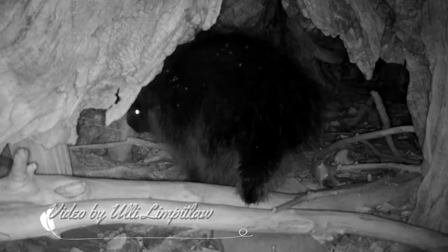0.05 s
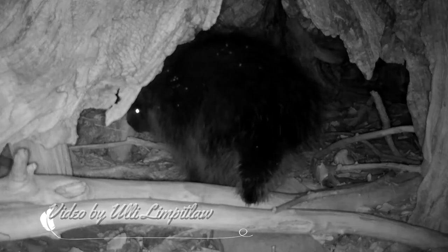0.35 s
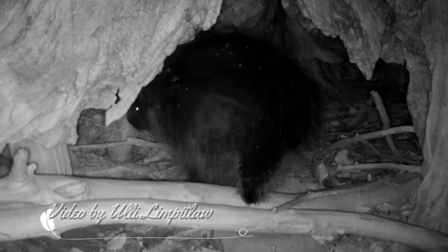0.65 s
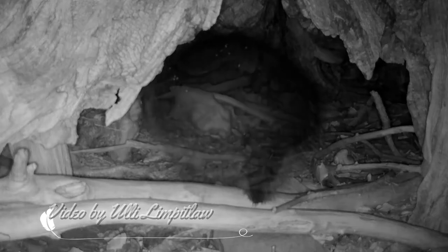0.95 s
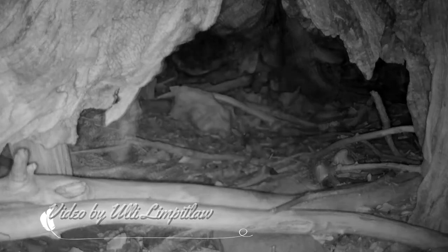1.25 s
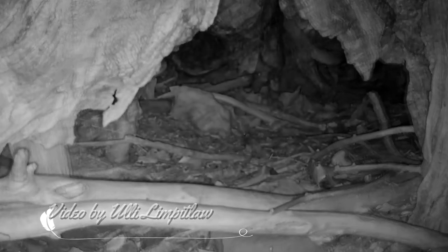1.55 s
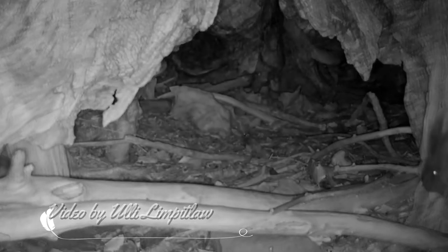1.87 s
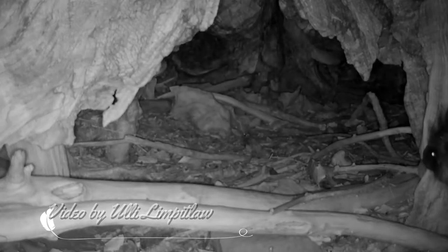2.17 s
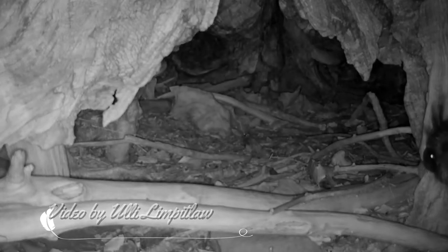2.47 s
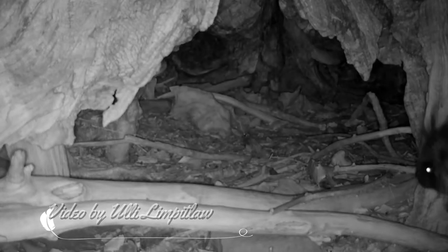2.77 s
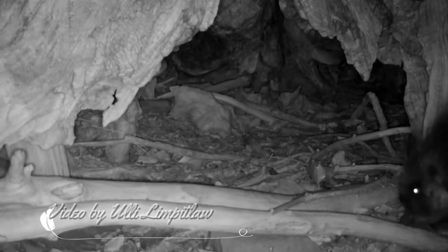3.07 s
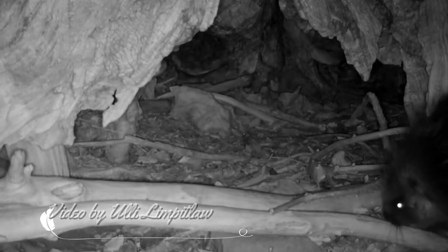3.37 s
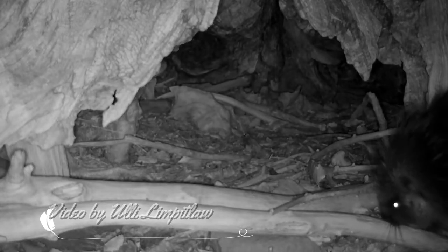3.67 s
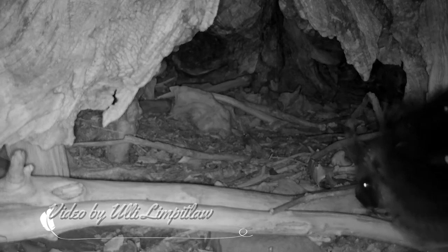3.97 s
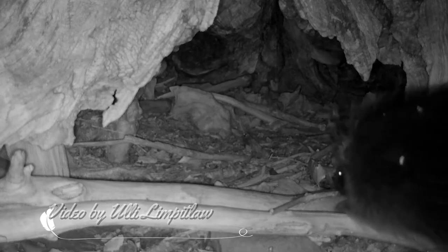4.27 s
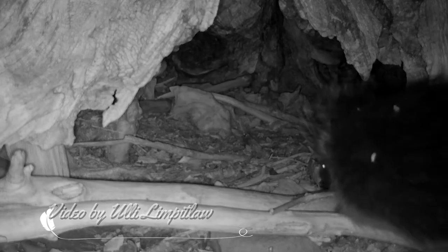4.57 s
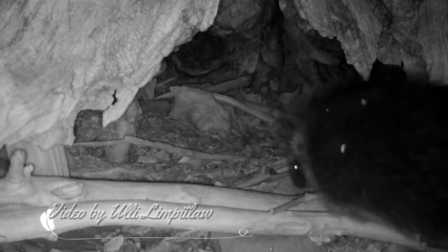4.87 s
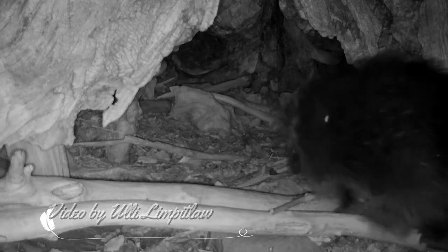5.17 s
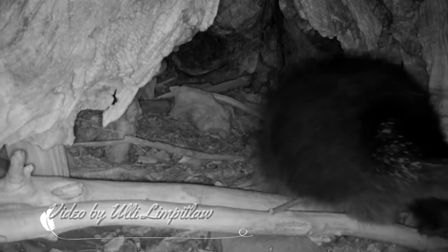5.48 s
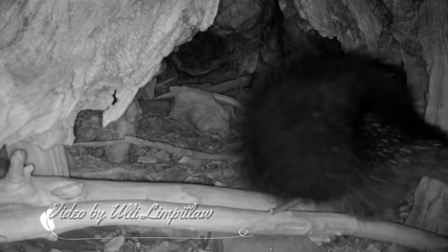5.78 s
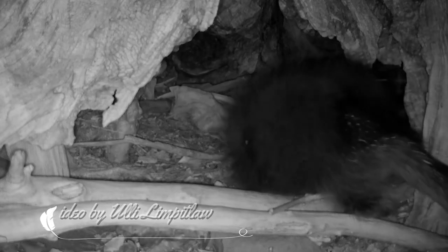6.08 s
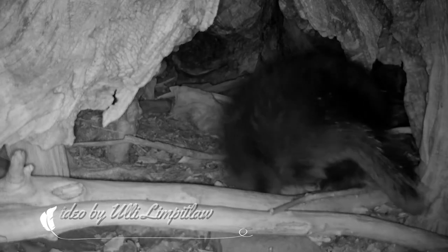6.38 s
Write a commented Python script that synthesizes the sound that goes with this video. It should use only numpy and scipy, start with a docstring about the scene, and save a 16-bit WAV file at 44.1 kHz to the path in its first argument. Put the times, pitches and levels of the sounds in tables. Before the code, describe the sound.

A faint woodland rush jumps suddenly louder, while an animal's claws and quills scratch wood and small twigs crack close by.

```python
"""A porcupine shuffles in and out of a hollow log at night.
A faint rush of far wind or water fills the wood, under a thin electronic whine and hiss.
From 1.2 s litter ticks, quills and claws scrape bark, and dry twigs snap.
At 1.55 s the sound cuts out for an instant and returns much louder, with a high fizz on the rush.
Feet pad softly from 1.8 s; two more spells of shuffling start at 2.2 s and 4.9 s."""
import sys
import numpy as np
from scipy import signal
from scipy.fft import rfft, irfft
from scipy.io import wavfile
from scipy.ndimage import uniform_filter1d

SR = 44100
rng = np.random.default_rng(int(sys.argv[2]) if len(sys.argv) > 2 else 0)


def generate_wav(signal):
    """Clip the signal to [-1, 1] and save it as 16-bit WAV at the path in sys.argv[1]."""
    frames = np.transpose(np.atleast_2d(signal))
    scaled = np.clip(frames, -1, 1) * 32767
    pcm = np.round(scaled).astype(np.int16)
    wavfile.write(sys.argv[1], SR, pcm)


N = 287973
TIME = np.arange(N) / SR
GAP_START_S, GAP_END_S = 1.553, 1.5685

# rush before and after the gap: (time [s], relative level [dB])
FAINT_RUSH = [(0, -59), (0.8, -60.5), (1.54, -64.5)]
LOUD_RUSH = [(1.64, -46), (2.03, -43), (2.89, -41.5), (4.51, -43), (5.19, -41), (6.37, -41.5), (6.42, -41)]
# spells of shuffling: (start [s], end [s], tick level [dB], scrape level [dB])
SPELLS = [(1.18, 1.46, -78, -64), (2.2, 3.45, -56.5, -51), (4.901, 6.5, -63, -50.5)]


def gain_of(db):
    """Decibels to amplitude."""
    return 10 ** (np.asarray(db) / 20)


def unit_rms(x):
    """Scales to rms 1."""
    return x / np.sqrt(np.mean(x ** 2) + 1e-20)


def coloured(x, spectrum):
    """Filters by (frequency [Hz], gain [dB]) points, joined on a log-frequency axis."""
    point_hz, point_db = np.transpose(spectrum)
    hz = np.fft.rfftfreq(len(x), 1 / SR)
    db = np.interp(np.log(hz + 1), np.log(point_hz + 1), point_db)
    return irfft(rfft(x) * gain_of(db), len(x))


def add(mix, start_s, sound):
    """Mixes a sound in at start_s."""
    part = mix[max(round(start_s * SR), 0):][:len(sound)]
    part += sound[:len(part)]


def swell_db(curve, time_s):
    """Height of a level curve above its median."""
    point_s, db = np.transpose(curve)
    return np.interp(time_s, point_s, db) - np.median(db)


def rush(curve, colour, treble_db, treble_per_swell, offset_db, patch_db=0.5, split_hz=1900):
    """Far turbulence: noise with faint drifting patches; the treble share varies with the swell."""
    hz, t, spectra = signal.stft(rng.standard_normal(N), SR, nperseg=1024, noverlap=768)
    patches = uniform_filter1d(rng.standard_normal(spectra.shape), size=12, axis=0)
    patches = unit_rms(uniform_filter1d(patches, size=14, axis=1))
    treble = (hz ** 4 / (hz ** 4 + split_hz ** 4))[:, None]
    shelf_db = treble * (treble_db + treble_per_swell * swell_db(curve, t))
    spectra = spectra * gain_of(patch_db * patches + shelf_db)
    air = signal.istft(spectra, SR, nperseg=1024, noverlap=768)[1][:N]
    return unit_rms(coloured(air, colour)) * gain_of(np.interp(TIME, *np.transpose(curve)) + offset_db)


def electronics(whine_hz=7796.2, step_hz=29.78, follow=0.98):
    """A thin whine whose phase steps back and forth, over white hiss that follows the rush level."""
    before_gap = TIME < GAP_START_S
    step_rad = 1.4 * np.tanh(5 * np.sin(2 * np.pi * step_hz * TIME))
    phase = 2 * np.pi * whine_hz * TIME + step_rad
    whine = np.sqrt(2) * (np.sin(phase) + gain_of(-18) * np.sin(2 * phase))
    whine_db = np.where(before_gap, -90.5, -89.0)
    hiss_db = np.where(before_gap, -86.0 + follow * swell_db(FAINT_RUSH, TIME),
                       -86.7 + follow * swell_db(LOUD_RUSH, TIME))
    return whine * gain_of(whine_db) + rng.standard_normal(N) * gain_of(hiss_db)


def litter(ticks_per_s=70, spread_db=5.0, decay_s=0.0012, highpass_hz=5500, rise_s=0.04, fade_s=0.076):
    """Bark crumbs crack underfoot: sparse, uneven, bright ticks that rise and settle with each spell."""
    sizes = gain_of(spread_db * np.minimum(rng.exponential(1, N), 2.5))
    impulses = sizes * (rng.random(N) < ticks_per_s / SR)
    cracks = rng.standard_normal(N) * signal.lfilter([1], [1, -np.exp(-1 / (decay_s * SR))], impulses)
    ticks = signal.sosfilt(signal.butter(2, highpass_hz, "highpass", fs=SR, output="sos"), cracks)
    stirring = np.zeros(N)
    for start_s, end_s, db, _ in SPELLS:
        early_s, late_s = np.maximum(start_s - TIME, 0), np.maximum(TIME - end_s, 0)
        stirring += gain_of(db) * np.exp(-early_s / rise_s - late_s / fade_s)
    return unit_rms(ticks) * stirring


def friction(strokes, slips_per_s, width_oct, noise_gain, crisp_hz=7000):
    """Each stroke is a flurry of tiny slips that rises fast and dies away."""
    out, t = np.zeros(N), np.arange(SR // 4) / SR
    hz = np.fft.rfftfreq(len(t), 1 / SR) + 1
    for start_s, db, length_s, centre_hz, crisp_db in strokes:
        slips = rng.standard_normal(len(t)) * (rng.random(len(t)) < slips_per_s / SR)
        age = 4 * t / length_s
        flurry = (unit_rms(slips) + noise_gain * rng.standard_normal(len(t))) * age * np.exp(-age)
        band = np.exp(-2 * (np.log2(hz / centre_hz) / width_oct) ** 2)  # the scraped piece
        crisp = gain_of(crisp_db) * 2 * hz / (hz + crisp_hz)  # its dry edges
        sound = irfft(rfft(flurry) * (band + crisp), len(t))[:len(t) - SR // 100]
        add(out, start_s, gain_of(db) * sound / np.sqrt(np.sum(sound ** 2) / (length_s * SR)))
    return out


def quill_scrapes(scrapes_per_s=26, length_s=0.019, centre_hz=4600, crisp_db=-11, spread_db=5):
    """Quills brush the bark lightly at uneven moments in each spell."""
    strokes = []
    for start_s, end_s, _, db in SPELLS:
        beats_s = np.arange(start_s, end_s, 1 / scrapes_per_s)
        for beat_s, (jitter, strength) in zip(beats_s, rng.uniform(-1, 1, size=(128, 2))):
            onset_s = beat_s + 0.5 * jitter / scrapes_per_s
            strokes.append((onset_s, db + spread_db * strength, length_s, centre_hz, crisp_db))
    return friction(strokes, slips_per_s=3000, width_oct=0.89, noise_gain=0.27)


def twig_snaps(rise_s=0.00022):
    """A twig gives way and rings briefly; thinner twigs ring higher."""
    # dry twig modes: (frequency [Hz], level [dB], t60 [s])
    modes = [(1770, -2, 0.032), (2860, 3.5, 0.022), (3510, 8.5, 0.0074), (3870, 1, 0.0044),
             (4770, 2.5, 0.012)]
    # breaks: (time [s], level [dB], pitch [ratio])
    breaks = [(1.189, -51, 1.05), (1.223, -54, 0.95), (1.313, -54, 1.37), (1.408, -50, 1.68),
              (1.454, -55, 0.97), (1.6026, -28.5, 1.04), (1.6272, -45, 1.42), (3.8307, -33, 0.905),
              (4.037, -34.5, .87), (6.464, -31.5, 0.68)]
    out, t = np.zeros(N), np.arange(SR // 20) / SR
    for start_s, db, pitch in breaks:
        ring = sum(gain_of(mode_db - 60 * t / t60_s) * np.sin(2 * np.pi * hz * pitch * t)
                   for hz, mode_db, t60_s in modes)
        add(out, start_s, gain_of(db) * ring * (1 - np.exp(-t / rise_s)))
    return out


def scratches():
    """Claws and quills drag hard over bark and litter."""
    # strokes: (time [s], level [dB], length [s], centre [Hz], crisp top [dB])
    strokes = [(1.19, -57, .011, 4000, -8), (1.202, -61, .01, 4500, -17), (1.222, -57, .009, 4300, -15),
               (1.311, -53, .01, 4400, -19), (1.405, -55, .01, 4950, -5), (1.622, -45, .018, 5500, -4),
               (2.785, -41, .015, 6000, 2), (3.124, -44.5, .016, 6000, 6), (3.68, -41, 0.018, 5500, -1),
               (3.81, -39, .044, 4700, -14), (3.829, -39, 0.029, 2800, -15), (4.031, -40, 0.019, 2660, -28),
               (4.888, -43, .017, 4750, -32), (5.02, -42, .012, 6000, -6), (5.048, -44, 0.1, 3400, -17),
               (5.302, -44, 0.024, 2900, -28), (5.736, -38.5, 0.032, 3380, -11),
               (6.456, -36.5, 0.059, 2400, -7), (6.475, -37.5, 0.038, 4170, -10)]
    return friction(strokes, slips_per_s=2500, width_oct=0.8, noise_gain=0.25)


def housing_colour(x):
    """The camera housing puts gentle peaks and dips in the loud rush."""
    # peaks and dips: (centre [Hz], width [Hz], gain [dB])
    resonances = [(737, 44, -3.5), (928, 62, 2.5), (2160, 410, 0.6), (3930, 520, -1.0), (4750, 310, 2.5)]
    hz = np.fft.rfftfreq(N, 1 / SR)
    lift_db = sum(db / (1 + (2 * (hz - centre_hz) / width_hz) ** 2)
                  for centre_hz, width_hz, db in resonances)
    return irfft(rfft(x) * gain_of(lift_db), N)


def fizz(offset_db=-44):
    """A thin high sizzle that follows the level of the loud rush."""
    # sizzle spectrum: (frequency [Hz], gain [dB])
    colour = [(20, -60), (7000, -40), (9000, -14), (10500, -3), (12000, -14.5), (16000, -15.5)]
    sizzle = unit_rms(coloured(rng.standard_normal(N), colour))
    return sizzle * gain_of(np.interp(TIME, *np.transpose(LOUD_RUSH)) + offset_db)


def footfalls():
    """The animal's weight drives wood and earth through a few slow cycles."""
    # steps: (time [s], level [dB], length [s], frequency [Hz])
    steps = [(1.783, -55, .06, 70), (2.698, -49.5, 0.06, 84), (2.739, -49, 0.033, 70),
             (4.568, -65, 0.096, 75)]
    out = np.zeros(N)
    for start_s, db, length_s, hz in steps:
        t = np.arange(0, length_s, 1 / SR)
        add(out, start_s, gain_of(db) * np.hanning(len(t)) * np.sin(2 * np.pi * hz * t))
    return out


def scene():
    """The far rush, faint and then loud, with the animal close by."""
    # rush spectra: (frequency [Hz], gain [dB])
    faint_colour = [(20, -17.5), (60, -16), (150, -10), (400, -3), (750, -1.5), (1300, -2.5), (2000, -5),
                    (3000, -10.5), (4000, -18), (5000, -22), (5700, -32), (7000, -46), (9000, -56)]
    loud_colour = [(20, -30.5), (65, -16), (140, -10.5), (270, -4.5), (450, 1), (640, 0.3), (800, -2.5),
                   (1100, -3.5), (1800, -6.5), (4100, -15), (5050, -16), (5850, -31), (8500, -56.5),
                   (16000, -88)]
    # treble roll-off on all the animal's sounds: (frequency [Hz], gain [dB])
    close_response = [(20, 1.5), (5200, -5), (5900, -17), (7000, -22.5), (8700, -37), (10600, -23),
                      (12500, -42), (16000, -54)]
    faint = rush(FAINT_RUSH, faint_colour, treble_db=-3.1, treble_per_swell=-0.45, offset_db=3.0)
    loud = rush(LOUD_RUSH, loud_colour, treble_db=0.82, treble_per_swell=0.17, offset_db=2.14)
    background = np.where(TIME < GAP_START_S, faint, housing_colour(loud) + fizz()) + electronics()
    animal = scratches() + quill_scrapes() + twig_snaps() + litter() + footfalls()
    return (background + coloured(animal, close_response))[None]


def record(dry):
    """Mutes the gap, then limits the band."""
    sounding = (TIME < GAP_START_S) | (TIME > GAP_END_S)
    lowpass = signal.firwin(511, cutoff=15850, window=("kaiser", 9), fs=SR)
    return signal.oaconvolve(dry * sounding, lowpass[None], "same")


dry = scene()
out = record(dry)
generate_wav(out)
```